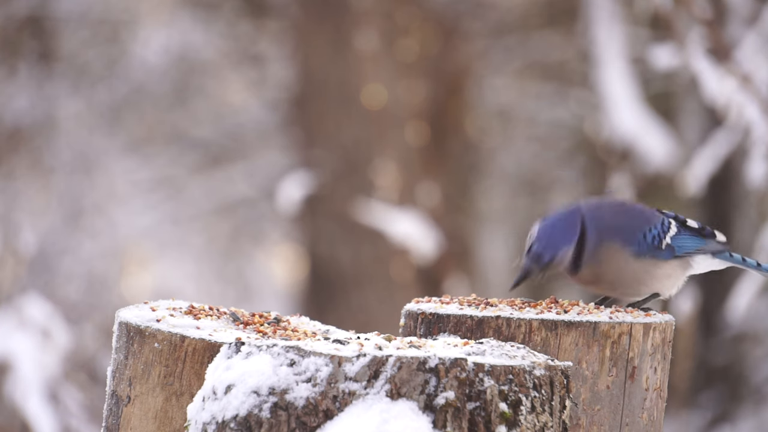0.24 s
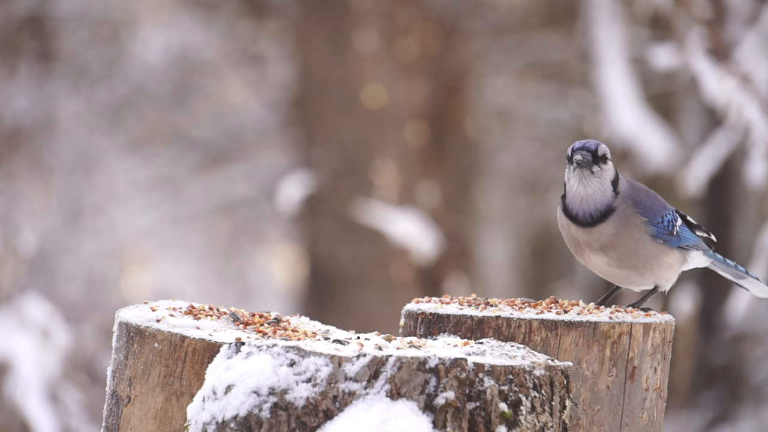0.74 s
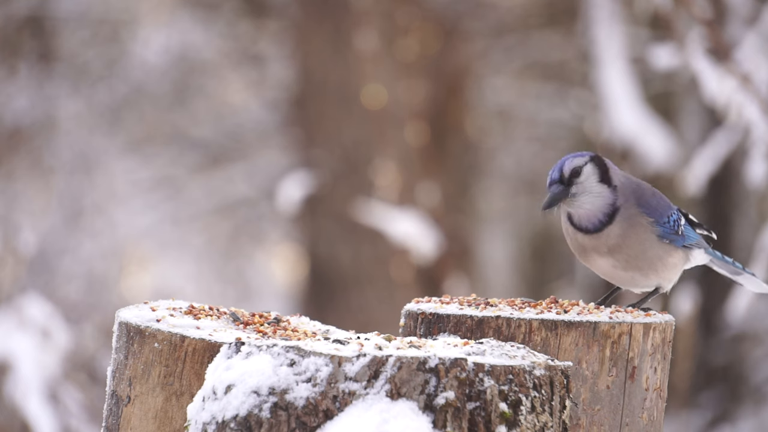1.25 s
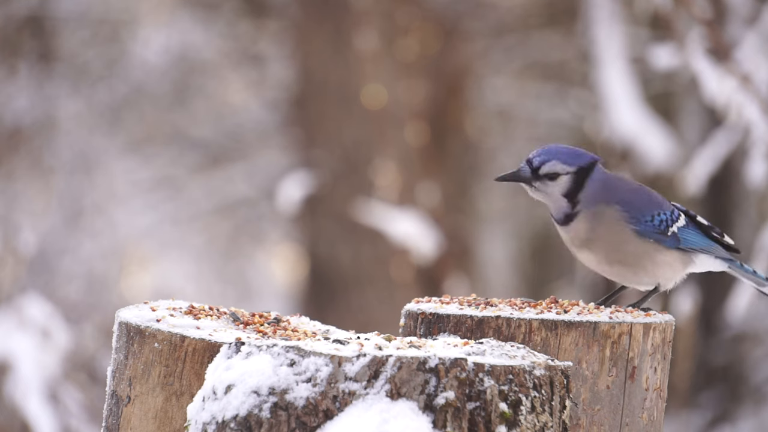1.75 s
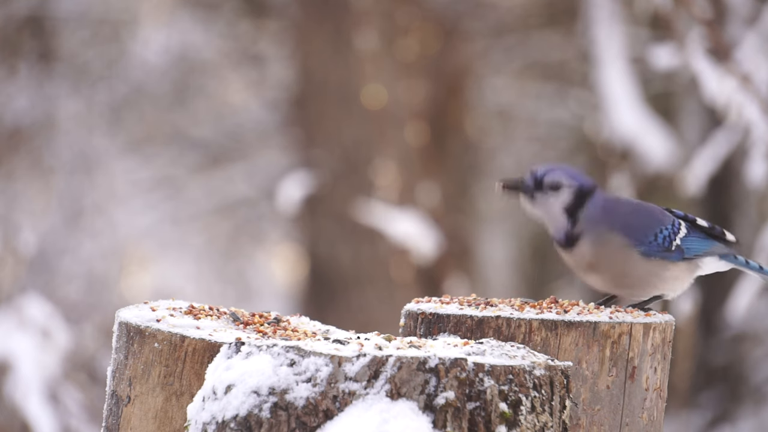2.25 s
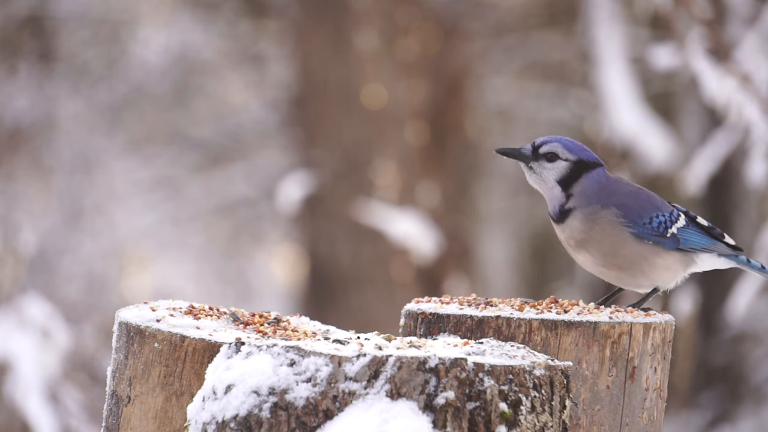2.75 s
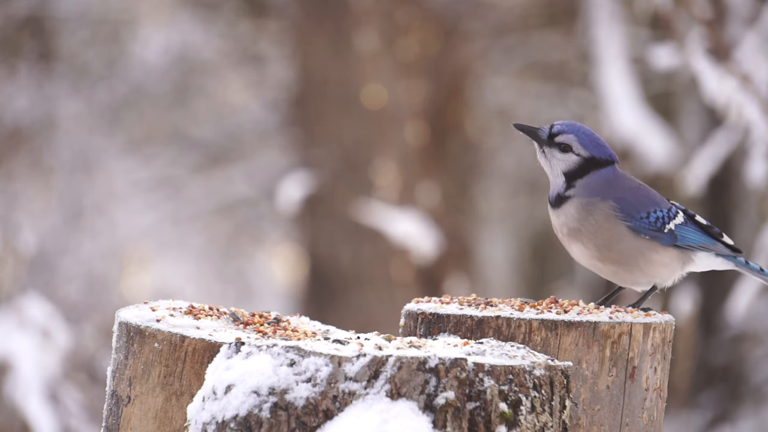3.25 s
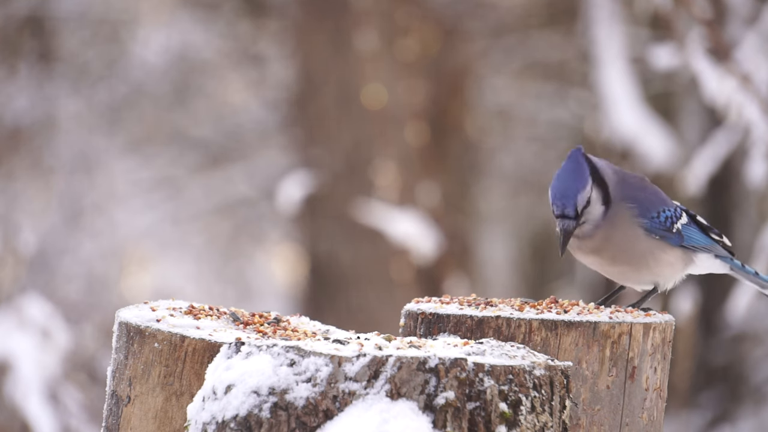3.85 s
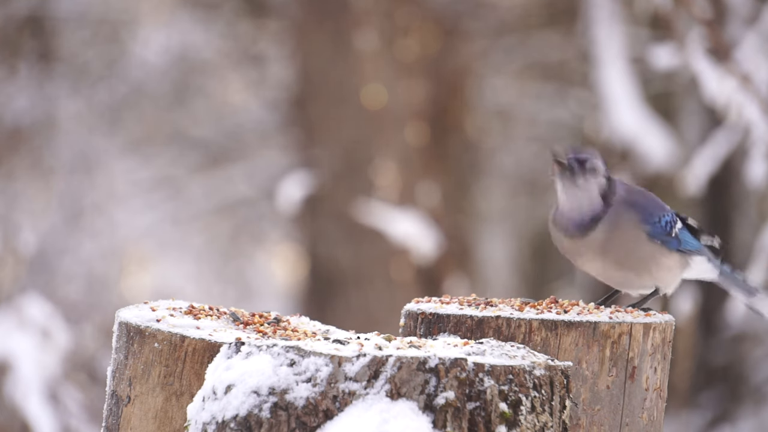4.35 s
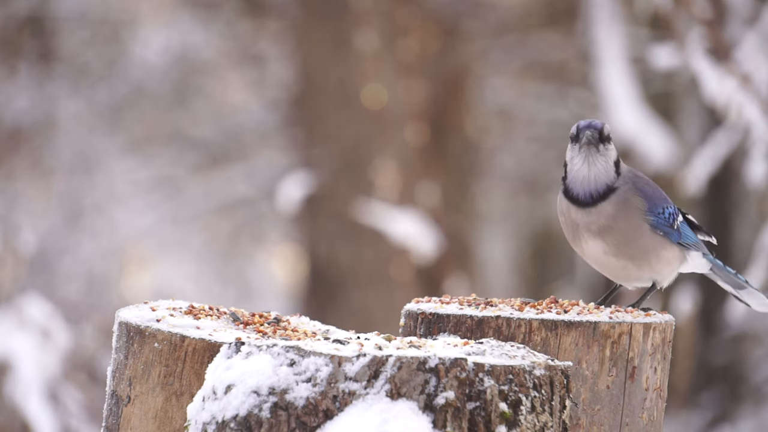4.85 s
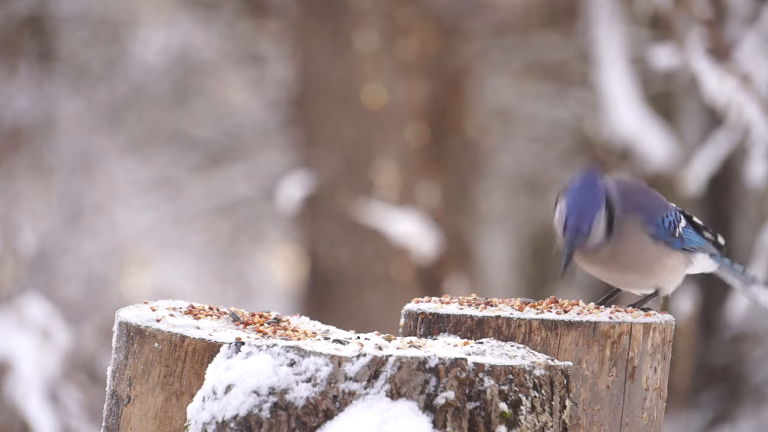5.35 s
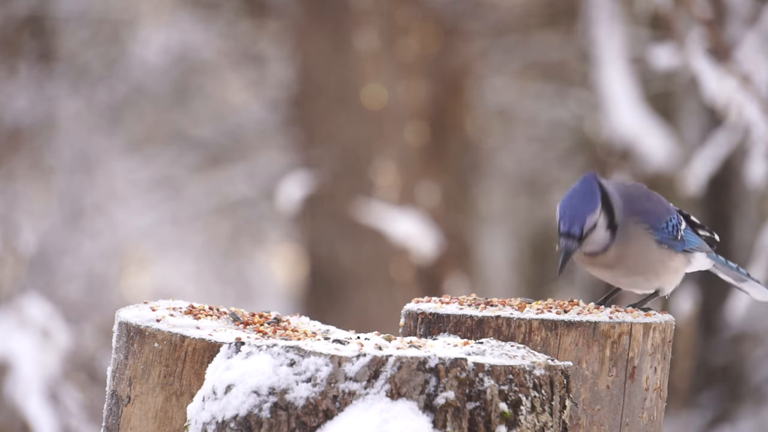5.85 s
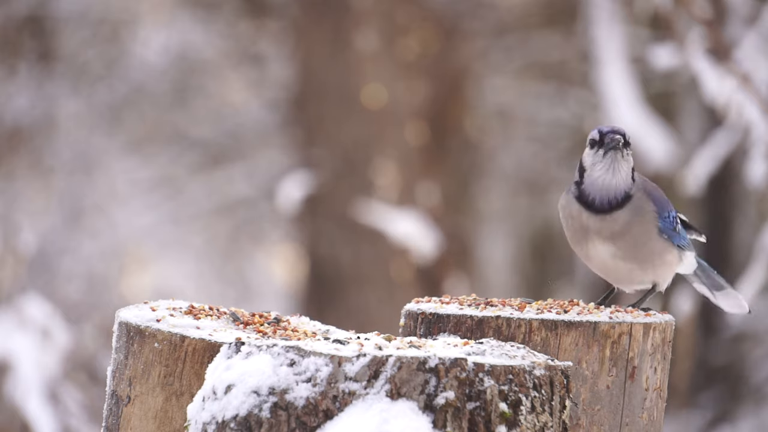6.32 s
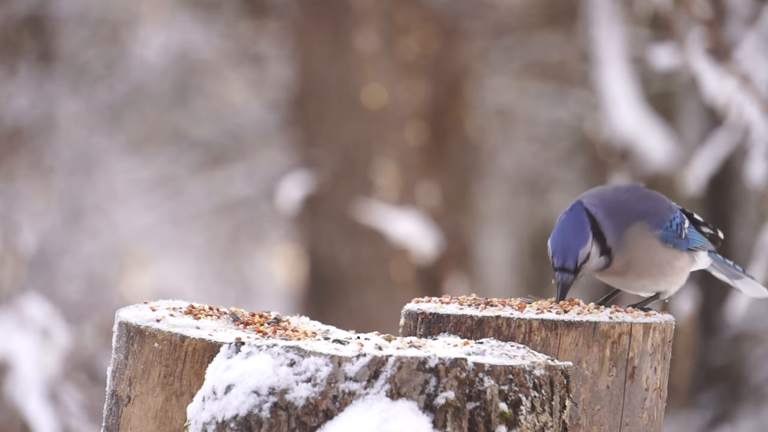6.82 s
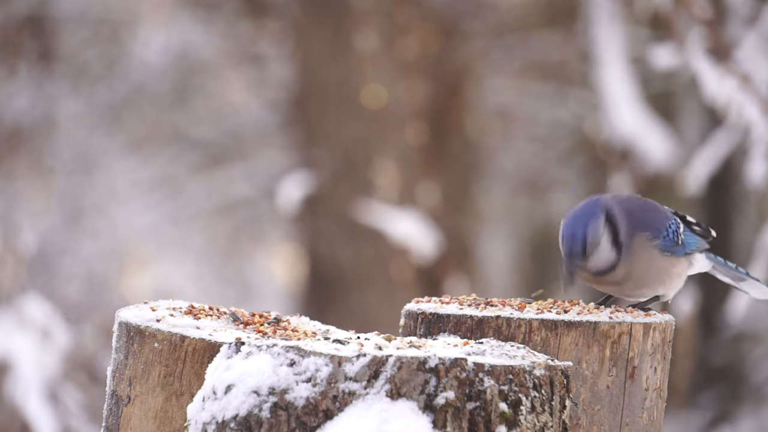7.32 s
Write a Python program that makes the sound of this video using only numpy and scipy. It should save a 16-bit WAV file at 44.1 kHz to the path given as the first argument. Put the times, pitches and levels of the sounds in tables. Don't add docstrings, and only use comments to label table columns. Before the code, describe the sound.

Two loud, metallic, rasping jay calls, each under half a second and sliding downward, stand far above a faint outdoor background. Around them are soft clucks at the start, sparse seed ticks, weak nasal nuthatch notes and sharp high chips that grow busier toward the end. Low traffic rumble and steady hiss continue throughout. A stereo microphone in open woodland catches quick reflections from a wall and trunks.

```python
import sys
import numpy as np
from scipy import signal
from scipy.fft import rfft, irfft, next_fast_len
from scipy.io import wavfile
from scipy.ndimage import uniform_filter1d

SR = 44100
rng = np.random.default_rng(int(sys.argv[2]) if len(sys.argv) > 2 else 0)


def nominal_scale(level):
    x = np.asarray(level, float) / 20
    return 10 ** x


def unload_audio(sound):
    columns = np.transpose(np.atleast_2d(sound))
    steps = np.round(np.clip(columns, -1, 1) * 32767)
    wavfile.write(sys.argv[1], SR, steps.astype(np.int16))


N = 334278
TIME = np.arange(N) / SR
CALL_S = .389


def rms_one(x):
    return x / np.sqrt(np.mean(x ** 2) + 1e-20)


def columns(rows, t):
    s, *cols = np.transpose(rows)
    return [np.interp(t, s, c) for c in cols]


def at_hz(points, hz):
    point_hz, value = np.array(points).T
    return np.interp(np.log(hz), np.log(point_hz), value)


def lowpass(order, hz, x):
    return signal.sosfilt(signal.butter(order, hz, fs=SR, output="sos"), x)


def bandpass(low_hz, high_hz, x):
    return signal.sosfilt(signal.butter(2, [low_hz, high_hz], "band", fs=SR, output="sos"), x)


def drift(hz, size):
    return rms_one(lowpass(2, hz, rng.standard_normal(size + 4000))[4000:])


def phase(hz):
    return 2 * np.pi * np.cumsum(hz, axis=-1) / SR


def add(out, s, x, pan_db=0.):
    i = round(s * SR)
    out[:, i:i + len(x)] += x[:N - i] * nominal_scale(np.array([[pan_db / 2], [-pan_db / 2]]))


def swell(length_s, power):
    u = np.linspace(0, 1, round(length_s * SR))
    return u, np.sin(np.pi * u) ** power


def air_noise(spectrum, lumps_db, lumps_hz):
    # frequency in Hz, left-right likeness.
    likeness = [(60, 0.99), (120, 0.99), (220, 0.58), (430, 0.35), (830, 0.087), (1590, -1.48), (3070, -2),
                (5920, -0.7), (11400, -0.0064)]
    # frequency in Hz, left-right lean in dB.
    lean = [(60, 1), (140, -1), (340, 0.5), (830, 4.5), (1980, -1), (4750, 2), (11400, 1.5)]
    size = next_fast_len(N)
    hz = np.arange(size // 2 + 1) * SR / size + 1e-3
    mid, side = rfft(rng.standard_normal((2, size)))
    alike = np.clip(at_hz(likeness, hz), -.5, 1)
    pair = np.sqrt(1 + alike) * mid + np.sqrt(1 - alike) * side * [[1], [-1]]
    pair = pair * nominal_scale(at_hz(spectrum, hz) + at_hz(lean, hz) * np.array([[.5], [-.5]]))
    pair[0] *= np.exp(-2j * np.pi * hz * 5 / SR)
    out = irfft(pair, size)[:, :N] * nominal_scale(lumps_db * drift(lumps_hz, size=N))
    return out / np.std(out.mean(axis=0))


def traffic():
    # time in seconds, rumble level in dB.
    swing = [
        (0.0, -46),
        (1.52, -48.5),
        (1.88, -50.5),
        (3.17, -50),
        (4.96, -52.5),
        (5.25, -47),
        (5.66, -51),
        (6.86, -51.5),
        (7.58, -52.5),
    ]
    # frequency in Hz, engine rumble in dB per Hz.
    rumble = [(13, -29.5), (22, -8), (48, 1), (67, 1.5), (86, -5), (118, 0), (173, -9.5), (220, -23),
              (290, -46.5), (480, -120)]
    # frequency in Hz, tyre noise in dB per Hz.
    road = [(110, -13), (180, -4), (296, -4), (351, -3.5), (397, -5), (450, -3), (517, -3.5), (811, -3),
            (1020, -9.5), (1150, -9.5), (1500, -34), (2530, -120)]
    rumble_db, = columns(swing, TIME)
    road_db = -53 + .55 * (rumble_db - rumble_db.mean())
    engines = nominal_scale(rumble_db + 2.5) * air_noise(rumble, lumps_db=2.7, lumps_hz=1.57)
    tyres = nominal_scale(road_db) * air_noise(road, lumps_db=.5, lumps_hz=3.0)
    return engines + tyres


def hiss():
    # frequency in Hz, level in dB per Hz.
    hiss_spectrum = [(900, -9.5), (1300, 3), (1700, -0.5), (2500, -3), (4000, -7), (6000, -7), (8500, -5),
                     (11000, -7), (12000, -10)]
    return nominal_scale(-56.5) * air_noise(hiss_spectrum, lumps_db=0.2, lumps_hz=7.5)


def motor():
    centre_hz, firings_per_s, level_db = 1454, 27, -66.5
    band = bandpass(centre_hz - 110, centre_hz + 110, rng.standard_normal(N))
    turn = np.pi * firings_per_s * TIME
    throb = nominal_scale(7 * np.cos(2 * turn) + 1.5 * np.cos(turn))
    return nominal_scale(level_db) * rms_one(band * throb) * nominal_scale(np.array([[3.5], [-5.5]]))


def pecks():
    # start in seconds, length in seconds, level in dB, lowest frequency in Hz.
    husks = [
        (0.366, 0.049, -54, 2930),
        (0.375, 0.071, -66, 4600),
        (4.256, .006, -55.5, 3020),
        (4.713, 0.0053, -55, 900),
        (5.958, .006, -57.5, 1500),
        (6.279, 0.014, -51.5, 812),
        (7.2, 0.0066, -55, 2996),
    ]
    out = np.zeros((2, N))
    for s, length_s, level_db, low_hz in husks:
        u, arch = swell(length_s, power=0.29)
        grains = rng.standard_normal(len(u)) * (rng.random(len(u)) < .1)
        bright = bandpass(low_hz, min(2.75 * low_hz, 11000), grains)
        add(out, s, nominal_scale(level_db) * arch * rms_one(bright))
    return out


def honks():
    # start in seconds, length in seconds, pitch in Hz, level in dB.
    nasal_notes = [
        (2.919, 0.12, 512, -59.5),
        (3.515, 0.14, 522, -62.5),
        (4.142, 0.093, 517, -58.5),
        (4.81, 0.12, 519, -63),
        (5.611, 0.088, 506, -59),
        (6.179, 0.096, 515, -60.5),
        (6.783, .115, 512, -61),
    ]
    # harmonic number, level in dB.
    partials = [(3, -4), (4, 2.5), (5, -1.5)]
    out = np.zeros(N)
    for s, length_s, hz, level_db in nasal_notes:
        u, arch = swell(length_s, power=.6)
        turn = phase(hz * (.93 + .25 * u - .3 * u ** 2.8)) + 0.19 * drift(118.2, size=len(u))
        tone = sum(nominal_scale(db) * np.sin(k * turn) for k, db in partials)
        i = round(s * SR)
        out[i:i + len(u)] = nominal_scale(level_db) * arch * tone
    return out


def clucks():
    # time in seconds, peak level in dB, second harmonic in Hz.
    soft_notes = [
        (0.0855, -46, 2240),
        (0.6144, -39, 2294),
    ]
    partials_db = [-4.5, 1, -8.5]
    out = np.zeros((2, N))
    u, arch = swell(0.018, power=0.86)
    for s, peak_db, second_hz in soft_notes:
        turn = phase(second_hz / 2 * (0.952 + 0.33 * u - 0.38 * u ** 2)) + .12 * drift(300, size=len(u))
        tone = sum(nominal_scale(db) * np.sin((k + 1) * turn) for k, db in enumerate(partials_db))
        note = nominal_scale(peak_db - 5.0 + 4.8 * u) * arch * tone
        add(out, s - .004, note, pan_db=-7)
        add(out, s + .009, nominal_scale(-9) * note, pan_db=-1.5)
    return out


def chips():
    # time in seconds, peak level in dB, lowest pitch in Hz, left-right lean in dB.
    wall_birds = [(1.459, -48, 7170, 5), (1.521, -45, 7580, 7), (1.6, -50, 7550, 6),
                  (3.5209, -50.5, 6600, 5), (3.9998, -50, 6800, 1.5), (4.0584, -42, 7150, 2.1),
                  (4.129, -43, 7400, 3), (4.1994, -47, 6980, 2.5), (5.7156, -51, 7080, 7),
                  (5.7683, -44.5, 7340, 4), (5.8342, -43, 7530, 2.5), (6.0656, -53, 6940, -3),
                  (6.4213, -52, 7130, 5), (6.5642, -48.5, 7000, 2.5), (6.6168, -46.5, 7160, 2.5),
                  (6.6817, -44, 6920, 3), (7.005, -43, 7500, 3), (7.0394, -49, 6600, 5.5),
                  (7.0936, -44.5, 6870, 4.5)]
    clear_bird = [
        (4.608, -49, 7800, -9),
        (4.673, -48, 7340, -6),
        (6.0994, -50, 8200, -4),
        (7.0698, -45.5, 7680, -5),
        (7.1277, -43.5, 7630, -7),
        (7.2012, -39, 7920, -7),
        (7.4354, -47, 9000, -4),
    ]
    # steepness of the opening dip (share per squared note position), upsweep as a rough share, wall
    # echo in dB.
    shapes = [
        (.45, 0.61, -4.5),
        (1.1, .21, -16),
    ]
    out = np.zeros((2, N))
    u, arch = swell(0.017, power=0.2)
    for birds, (dip, sweep, echo_db) in zip((wall_birds, clear_bird), shapes):
        for s, peak_db, hz, pan_db in birds:
            bend = np.where(u < .45, dip * (u - .45) ** 2, 4.84 * sweep * np.abs(u - .45) ** 2.34)
            turn = phase(.97 * hz * (1 + bend)) + 0.63 * drift(610, size=len(u))
            note = nominal_scale(peak_db - 5.5 - 4.1 * bend) * arch * np.sin(turn)
            echo = nominal_scale(echo_db) * (1 + .5 * drift(300, size=len(u))) * note
            add(out, s - .004, note, pan_db)
            add(out, s + .0185, echo, pan_db)
    t = np.arange(SR // 4) / SR
    twigs = rng.standard_normal((2, len(t))) * nominal_scale(-60 * t / .3)
    twigs = twigs / np.sqrt(np.sum(twigs[0] ** 2))
    return out + nominal_scale(-3) * signal.fftconvolve(out, twigs, axes=1)[:, :N]


def effort(t, start, peak_db, place, release_db):
    rise_db, fall_db = 6, 9.5
    snap_s, open_s, release_s, late_s = .012, .024, .03, 0.084
    since, left = t - start, start + CALL_S - t
    u = since / CALL_S - place
    arch_db = -np.where(u < 0, rise_db * np.abs(u / place) ** 1.38, fall_db * 4 * u ** 2)
    closing = np.clip(1 - left / release_s, 0, 1)
    shut = np.clip((open_s - since) / (open_s - snap_s), 0, 1)
    late = np.clip(1 - left / late_s, 0, 1)
    level_db = peak_db + arch_db - 6 * shut - release_db * closing ** 2
    lower_db = -2.5 + 16 * shut + 9 * late
    tilt = .6 + 0.61 * arch_db + 1.5 * shut - 1.5 * late
    return level_db, lower_db, tilt, closing, np.maximum(shut, late)


def locking(t, upper, along, closing):
    # start in seconds, end in seconds, lower/upper ratio, slip time in seconds.
    locks = [
        (2.3, 2.342, 1 / 2, .012),
        (2.457, 2.515, 1 / 2, .009),
        (2.558, 2.594, 2 / 3, .008),
        (4.93, 5.15, 1 / 2, .026),
    ]
    free_hz, sag_hz, locked_rough_db = 993, 45, -35
    ratio = (free_hz - sag_hz * closing) / upper
    rough_db = -29 + 13 * along + 13 * closing
    for begin, end, locked, slip_s in locks:
        caught = np.clip(np.minimum(t - begin, end - t) / slip_s + 1, 0, 1)
        ratio = ratio + caught * (locked - ratio)
        rough_db = rough_db + caught * (locked_rough_db - rough_db)
    return ratio, rough_db


def jay():
    # start in seconds, peak in dB, place of the peak 0-1, release in dB.
    calls = [
        (2.3041, -18.5, 0.58, 12),
        (4.9311, -17, 0.48, 2),
    ]
    # time in seconds, pitch in Hz.
    pitches = [
        [(2.33, 1914), (2.404, 1835), (2.502, 1708), (2.628, 1618), (2.65, 1573), (2.676, 1512), (2.69, 1470)],
        [(4.96, 1864), (5.012, 1861), (5.132, 1662), (5.186, 1659), (5.304, 1526), (5.31, 1508)],
    ]
    upper_dbs = [-2, 0, 1, -2.5, -6, -10, -10.5, -6]
    mixing_dbs = [3.26, 4.7, -3, -5, -55]
    # frequency in Hz, throat gain in dB.
    throat = [(600, -45.5), (1000, -28.5), (1270, -22.5), (1600, -10), (2100, -4.5), (2700, -3.5),
              (3300, 4), (3800, 2), (4400, -13), (5500, -15.5), (7000, -4.5), (8300, -11), (11000, -11),
              (12500, -36)]
    beak_hz, beak_db, beak_octaves = 4930, 11, 0.22
    out = np.zeros(N)
    for pitch, call in zip(pitches, calls):
        start = call[0]
        t = start + np.arange(round((CALL_S + .003) * SR)) / SR
        since = t - start
        pitch_hz = columns(pitch, t)[0]
        level_db, lower_db, tilt, closing, shut = effort(t, *call)
        ratio, rough_db = locking(t, pitch_hz, since / CALL_S, closing)
        slack = np.clip(1 - since / 0.0185, 0, 1) ** 1.6
        waver = 1 + 0.0055 * drift(43, size=len(t))
        upper = pitch_hz * (1 - .33 * slack) * waver
        lower = upper * ratio
        joined = np.clip((since - .009) / 0.011, 0, 1)
        turn_up = phase(upper) + .55 * nominal_scale(rough_db) * drift(1000, size=len(t))
        turn_low = phase(lower) + 1.6 * nominal_scale(rough_db) * drift(300, size=len(t))
        voice = np.zeros(len(t))
        for m, upper_db in enumerate(upper_dbs):
            for n, mix_db in enumerate(mixing_dbs):
                hz = m * upper + n * lower + 1
                ring_db = beak_db * shut * np.exp(-(np.log2(hz / beak_hz) / beak_octaves) ** 2)
                gain = nominal_scale(upper_db + mix_db + ring_db + tilt * np.log2(hz / 3400))
                gain = gain * (hz < 13000) * (m + n > 0)
                share = joined * nominal_scale(lower_db - 3.5 - 1.57 * m) if n else 1
                spread = m * m + n * n
                voice += gain * share * np.cos(m * turn_up + n * turn_low + spread)
        bins = np.arange(len(t) // 2 + 1) * SR / len(t) + 1
        voice = irfft(rfft(voice) * nominal_scale(at_hz(throat, bins)), len(t))
        even = np.sqrt(uniform_filter1d(voice ** 2, size=441))
        fade = np.clip(since / .0006, 0, 1) * np.clip((t[-1] - t) / .005, 0, 1)
        i = round(start * SR)
        out[i:i + len(t)] = voice / even * nominal_scale(level_db) * fade
    return out


def wood(x):
    # delay in seconds, left level in dB, right level in dB.
    reflections = [
        (.0228, -13, -2.5),
        (0.035, -24.5, -25),
        (0.027, -4, -52),
        (0.024, -34, -42),
        (.128, -29, -27),
    ]
    t60_s, tail_db, tail_cut_hz = 1.0, -25, 6000
    t = np.arange(SR) / SR
    decay = nominal_scale(-60 * t / t60_s + 1.0 * drift(36, size=SR)) * np.clip(t / 0.069, 0, 1)
    tail = lowpass(1, tail_cut_hz, rng.standard_normal((2, SR)) * decay)
    echoes = np.zeros((2, SR))
    for delay_s, left_db, right_db in reflections:
        echoes[0, round(delay_s * SR)] += nominal_scale(left_db)
        echoes[1, round(delay_s * SR) + 1] += nominal_scale(right_db)
    echoes = bandpass(2000, 7500, echoes)
    response = echoes + nominal_scale(tail_db) * tail / np.sqrt(np.sum(tail ** 2, axis=1, keepdims=True))
    response[:, 0] += nominal_scale(np.array([.8, -.8]))
    return signal.fftconvolve(x[None], response, axes=1)[:, :N]


def scene():
    background = traffic() + hiss() + motor()
    small_sounds = pecks() + clucks() + chips()
    return background + small_sounds + wood(honks() + jay())


def low_pass(x):
    return signal.sosfilt(signal.butter(12, 12000, fs=SR, output="sos"), x)


def record(dry):
    cut = signal.sosfilt(signal.ellip(12, .3, 70, 11000, fs=SR, output="sos"), dry)
    return low_pass(cut)


dry = scene()
out = record(dry)
unload_audio(out)
```